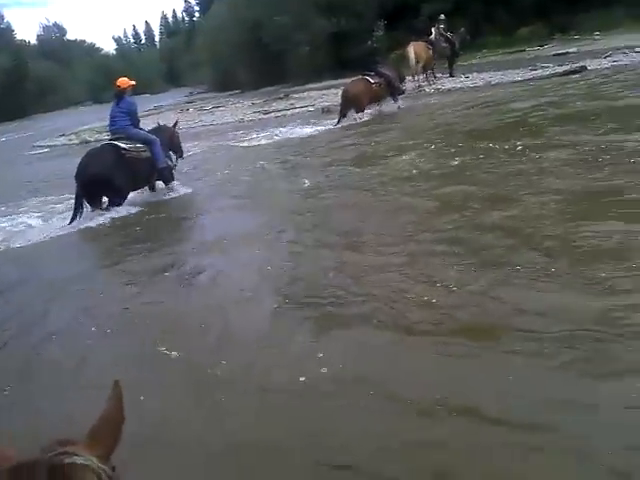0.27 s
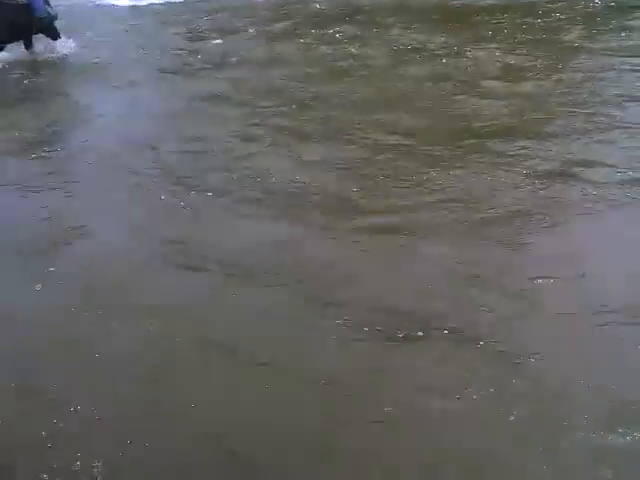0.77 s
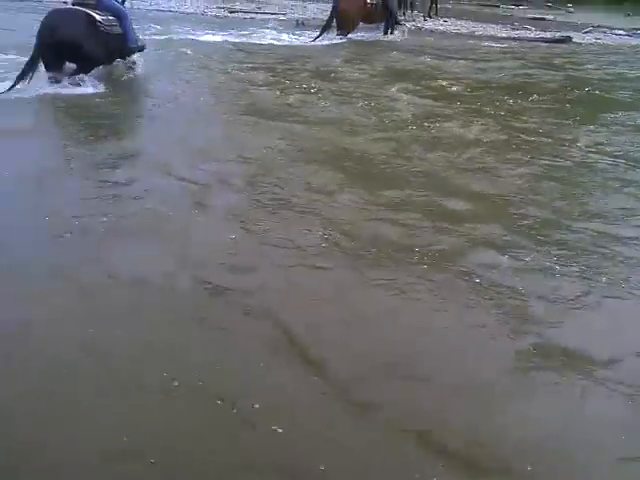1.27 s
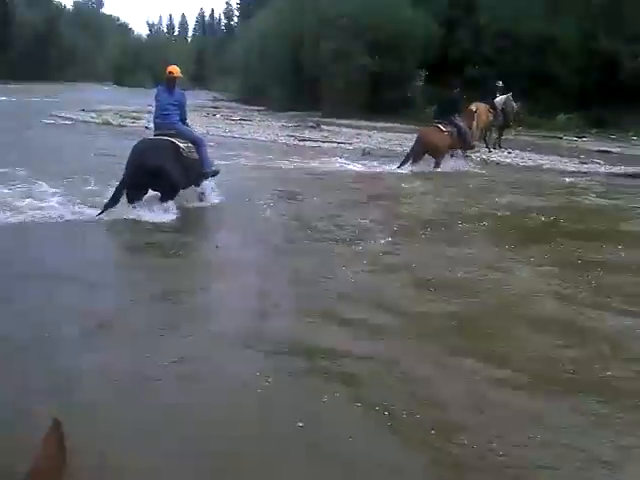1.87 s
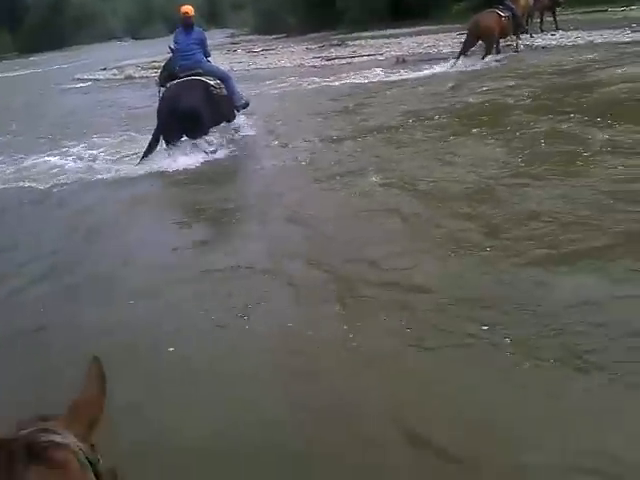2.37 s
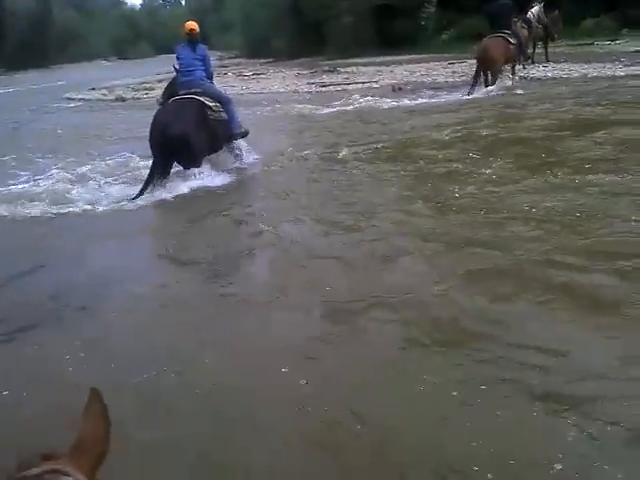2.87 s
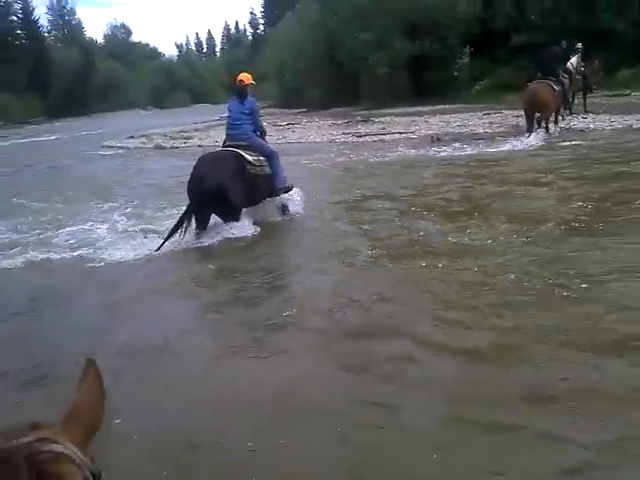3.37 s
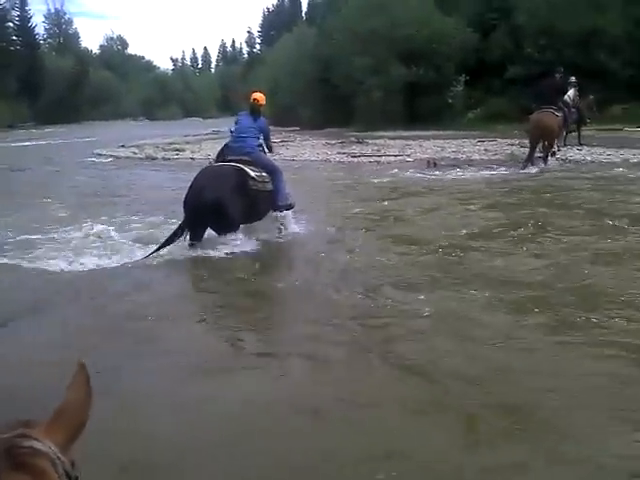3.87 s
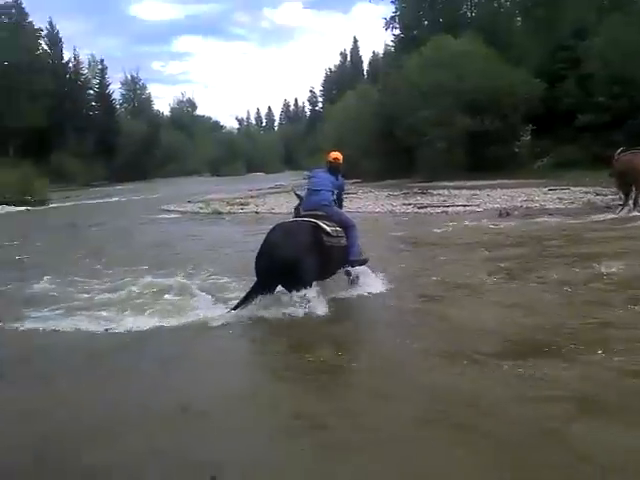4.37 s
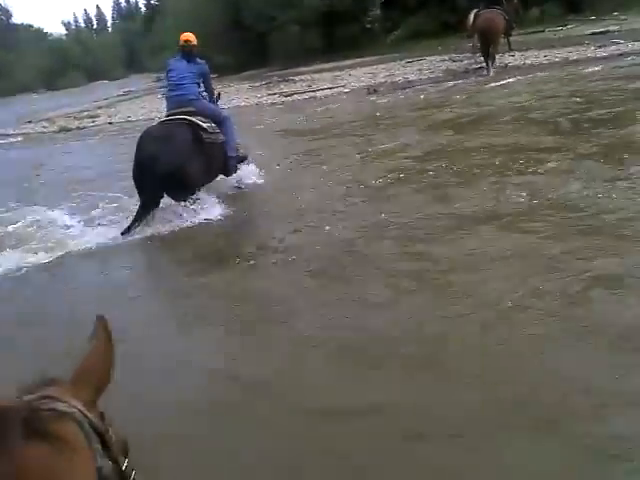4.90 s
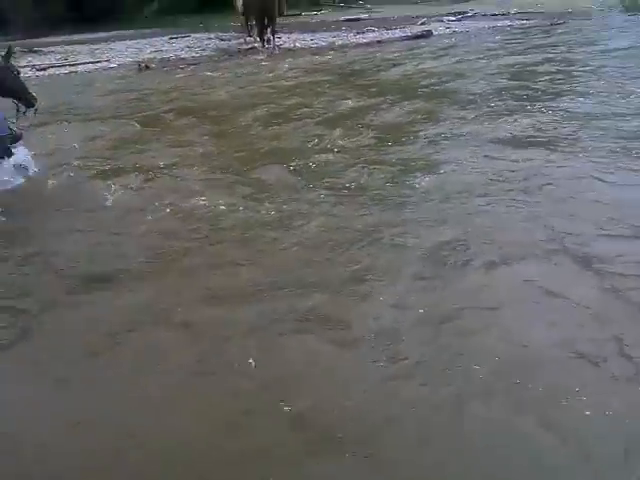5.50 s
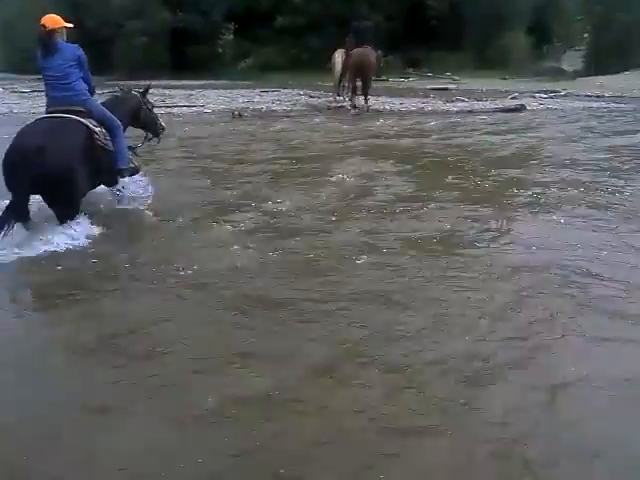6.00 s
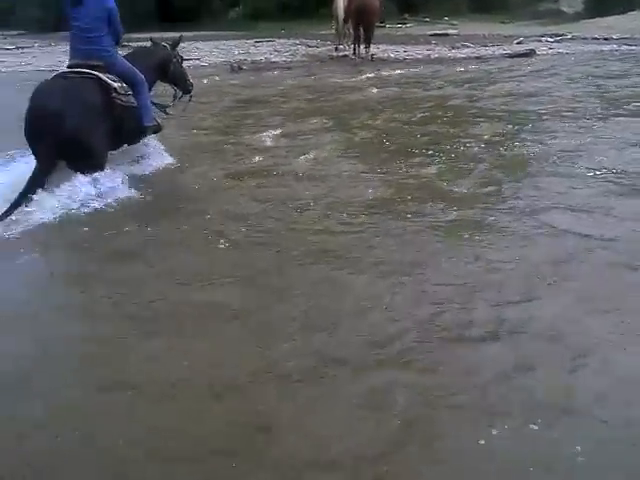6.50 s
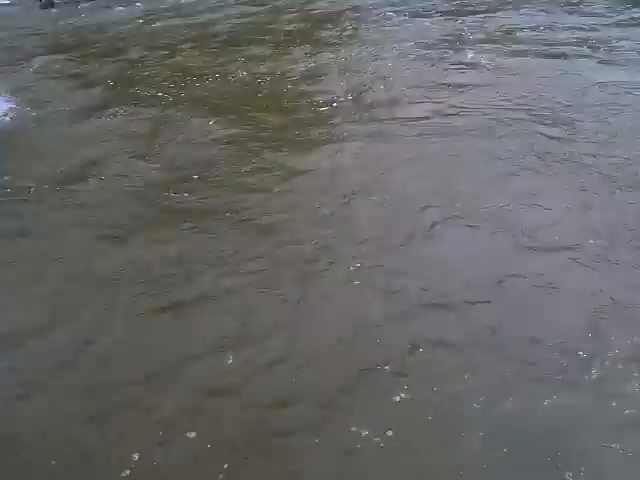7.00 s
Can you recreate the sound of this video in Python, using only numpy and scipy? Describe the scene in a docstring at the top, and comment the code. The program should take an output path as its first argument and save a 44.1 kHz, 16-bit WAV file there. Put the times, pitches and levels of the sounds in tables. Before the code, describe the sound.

Fast shallow creek water rushes steadily while horses wade through, their legs churning up gurgles, hollow gulps, sharp slaps and ragged splashes close by.

```python
"""Horses wading a shallow creek

Horses wade through a fast, shallow creek, heard in mono through a small microphone held by a rider.
Churned water sloshes, gurgles, rushes and sprays: four spectra of noise and clicks in flickering bands.
Droplets and gulps are rising sine pings; slaps, splashes and puffs of wind are shaped noise.
Six times the whole level drops at once and creeps back.
"""
import sys
import numpy as np
from scipy import signal
from scipy.io import wavfile

SR = 44100
rng = np.random.default_rng(int(sys.argv[2]) if len(sys.argv) > 2 else 0)


def log_audio(samples):
    """Write samples as a 16-bit WAV file to the path given in sys.argv[1]."""
    # one column per channel
    frames = np.atleast_2d(samples).T
    # limit to full scale, then quantise
    limited = np.clip(frames, -1, 1)
    pcm = np.round(limited * 32767).astype(np.int16)
    wavfile.write(sys.argv[1], SR, pcm)


N = 319725


def from_db(db):
    """Decibels to gain."""
    return 10 ** (np.asarray(db) / 20)


def rms_one(x):
    """Scale to rms 1."""
    return x / np.sqrt(np.mean(x ** 2) + 1e-20)


def at_hz(spectrum, hz):
    """Read a spectrum on a log-frequency axis."""
    f_hz, level_db = np.transpose(spectrum)
    return np.interp(np.log(hz), np.log(f_hz), level_db)


def bell(u_s, width_s):
    """Gaussian of peak 1 and full width width_s at half height."""
    return np.exp(-np.log(2) * (2 * u_s / width_s) ** 2)


def drift(corner_hz):
    """Slow chance of spread 1: noise at SR/40 through a double one-pole low-pass, run in."""
    step = 40
    pole = np.exp(-2 * np.pi * corner_hz * step / SR)
    white = rng.standard_normal(N // step + 2002)
    slow = signal.lfilter([1], [1, -2 * pole, pole * pole], white)[2000:]
    slow = rms_one(slow - slow.mean())
    return np.interp(np.arange(N) / step, np.arange(len(slow)), slow)


def bursts(per_s, spread_db):
    """Random clicks of very uneven size, as bubbles being born; rms 1."""
    sizes = from_db(spread_db * np.minimum(rng.exponential(1, N), 5))
    signs = rng.choice([-1, 1], N)
    born = rng.random(N) < per_s / SR
    return rms_one(sizes * signs * born)


def patchy(spectrum, swell, near_share, per_s, spread_db, patchy_db, flicker_hz):
    """Quarter-octave bands, each a size of bubble or eddy: far ones merge, near ones stand apart; rms 1."""
    low_hz, high_hz = spectrum[0][0], spectrum[-1][0]
    edges_hz = low_hz * 2 ** np.arange(0, np.log2(high_hz / low_hz) + 0.25, 0.25)
    drives = []   # three, so neighbouring sizes are born apart
    for _ in range(3):
        far = np.sqrt(1 - near_share) * rng.standard_normal(N)
        near = np.sqrt(near_share) * bursts(per_s, spread_db)
        drives.append(far + near)
    out = 0
    for k, (low, high) in enumerate(zip(edges_hz, edges_hz[1:])):
        bandpass = signal.butter(2, [low, high], "band", fs=SR, output="sos")
        band = signal.sosfilt(bandpass, drives[k % 3])
        level_db = at_hz(spectrum, np.sqrt(low * high)) + patchy_db * drift(flicker_hz)
        out = out + band * from_db(level_db)
    return rms_one(out * swell)


def swells(floor_db, rows):
    """A steady floor with bell-shaped swells added in power, as a gain."""
    t = np.arange(N) / SR
    power = from_db(2 * floor_db)
    for peak_s, peak_db, width_s in rows:
        power = power + from_db(2 * peak_db) * bell(t - peak_s, width_s)
    return np.sqrt(power)


def wading_levels():
    """Gains of gurgle, rush and spray as the legs churn the water, each wandering by chance."""
    # churned water before sway: t/s, gurgle/dB, rush/dB, spray/dB
    wading = [(0.0, -24.5, -22, -28.5), (0.52, -27.5, -24, -30), (0.7, -30, -21.5, -26.5),
              (0.83, -28, -24.5, -30.3), (1.02, -26.5, -22.5, -28.5), (1.17, -28.5, -24, -29.5),
              (1.45, -26, -22.5, -29.2), (1.6, -27.5, -21.5, -28.7), (2.3, -27, -22, -28.5),
              (2.46, -26, -20.5, -27.5), (2.65, -28, -22, -27.5), (3.05, -26, -23, -30.5),
              (3.46, -27, -22, -26), (3.6, -30, -22.5, -28.5), (3.78, -26, -21, -29),
              (4.1, -24.5, -21, -28.5), (4.62, -28.5, -19.3, -27.5), (4.7, -29, -22, -29.5),
              (4.97, -26, -21, -28.8), (5.45, -27.5, -22.5, -30.5), (5.67, -24, -21.5, -28),
              (5.8, -27.5, -21.5, -28), (6.03, -29, -23, -29), (6.17, -24.5, -21, -27),
              (6.35, -26.5, -21.5, -27.5), (7.25, -27, -22, -28.5)]
    sway_db, sway_hz = 0.74, 3.3
    t_s, *levels_db = np.transpose(wading)
    t = np.arange(N) / SR
    return [from_db(np.interp(t, t_s, level_db) + sway_db * drift(sway_hz)) for level_db in levels_db]


def slosh(heave):
    """Deep slosh, swelling as a leg pushes through."""
    # relative spectral density: f/Hz, level/dB
    slosh_spectrum = [(50, -36.5), (70, -17), (100, -0.5), (135, 3.5), (180, -14)]
    # pushes of a leg: t/s, peak level/dB, width at half power/s
    surges = [(0.3, -32, .09), (0.466, -32, 0.088), (0.753, -41, 0.11), (1.07, -39, 0.32),
              (2.107, -35, .12), (2.56, -44.5, 0.37), (3.244, -36.5, .15), (3.546, -25.5, 0.077),
              (4.276, -39, .05), (4.553, -31.5, .12), (4.93, -41, 0.036), (5.61, -30.5, 0.11),
              (5.736, -29.5, 0.079), (6.184, -42, 0.22), (6.5, -36, 0.1), (6.64, -34, .06),
              (6.83, -26.5, 0.062), (7.0, -36, .04)]
    water = patchy(slosh_spectrum, from_db(0.6 * heave), near_share=0.57, per_s=40,
                   spread_db=2.0, patchy_db=-1.0, flicker_hz=16)
    return swells(-47.5, surges) * water


def gurgle(level, heave):
    """Large bubbles in the churned water: low-mid noise with sparse clicks."""
    # relative spectral density: f/Hz, level/dB
    gurgle_spectrum = [(90, -26.5), (130, -8), (185, -1), (226, 1), (332, 2), (438, -1.5), (800, -5.5),
                       (1040, -27)]
    return level * patchy(gurgle_spectrum, from_db(0.36 * heave), near_share=0.23, per_s=150,
                          spread_db=2.0, patchy_db=1.5, flicker_hz=6.7)


def rush(level, heave):
    """Middling bubbles, mostly merged into noise."""
    # relative spectral density: f/Hz, level/dB
    rush_spectrum = [(350, -23.5), (600, -2), (955, -1), (1400, 0.5), (1900, 1.5), (2500, -3), (3100, -9.5),
                     (3800, -14), (4700, -47.5)]
    return level * patchy(rush_spectrum, from_db(1.35 * heave), near_share=0.15, per_s=1500,
                          spread_db=2.0, patchy_db=0.61, flicker_hz=6)


def spray(level, heave):
    """The smallest bubbles: treble noise with dense, very uneven clicks."""
    # relative spectral density: f/Hz, level/dB
    spray_spectrum = [(2000, -31), (3000, -8), (3800, -4), (4700, -4.5), (5600, -4), (6600, 0), (7400, 1.5),
                      (8600, -4)]
    return level * patchy(spray_spectrum, from_db(0.83 * heave), near_share=0.28, per_s=2800,
                          spread_db=4.5, patchy_db=0.96, flicker_hz=11)


def droplets(per_s, low_hz, high_hz, decay_cycles, spread_db):
    """Single near bubbles of chance size, each ringing a few cycles and rising in pitch; rms 1."""
    out = np.zeros(N + SR)
    for when, pitch, size in rng.random((round(per_s * N / SR), 3)):
        hz = low_hz * (high_hz / low_hz) ** pitch
        samples = np.arange(round(4 * decay_cycles * SR / hz))
        decays = samples * hz / SR / decay_cycles   # time in decay lengths
        cycles = decay_cycles * (decays + 0.041 * decays ** 2)
        ping = np.exp(-decays) * np.sin(2 * np.pi * cycles)
        gain = from_db(-spread_db * np.log(size + 1e-2))   # few large, many small
        start = int(when * N)
        out[start:start + len(ping)] += gain * ping
    return rms_one(out[:N])


def wind():
    """Puffs of wind on the microphone: patchy low rumble over a faint floor."""
    # relative spectral density: f/Hz, level/dB
    wind_spectrum = [(12, -4), (30, 5), (60, 1), (90, -14)]
    # puffs: t/s, peak level/dB, width at half power/s
    puffs = [(0.36, -41, .1), (0.64, -36, .04), (0.85, -42.5, .3), (2.56, -46, .2), (3.29, -40, .04),
             (3.88, -46, .15), (4.89, -47, .08), (5.47, -44.5, .1), (5.75, -45, .08), (6.7, -48.5, .1)]
    rumble = patchy(wind_spectrum, from_db(1.5 * drift(9.6)), near_share=0.4, per_s=24,
                    spread_db=2.0, patchy_db=-0.5, flicker_hz=5)
    return swells(-61, puffs) * rumble


def gulps():
    """Air closing behind the legs: each pocket swells, rings a few cycles and rises in pitch."""
    # larger pockets: t/s, peak level/dB, pitch f/Hz
    pockets = [(0.032, -25, 224), (0.082, -20, 433), (0.299, -17.5, 156), (0.393, -17, 433),
               (0.48, -24, 126), (0.91, -24.5, 164), (1.078, -17, 150), (1.14, -25, 95),
               (1.696, -11.5, 322), (1.738, -16, 272), (1.845, -16.5, 308), (1.961, -15.5, 358),
               (2.014, -17.5, 142), (2.126, -25.0, 128), (2.455, -17, 350), (2.906, -19, 288),
               (2.986, -15.5, 738), (3.311, -12.5, 408), (3.543, -23, 119), (3.959, -14, 361),
               (3.991, -21.5, 284), (4.197, -21, 496), (4.344, -23, 306), (4.444, -18, 272),
               (4.953, -18, 391), (5.19, -21, 308), (5.528, -20, 226), (5.594, -27, 101), (5.658, -17, 235),
               (5.705, -27, 150), (6.198, -25, 165), (6.419, -17.5, 363), (6.511, -11.5, 226),
               (7.0, -28, 110)]
    length_cycles = 4.3
    small_per_s, small_db, small_low_hz, small_high_hz = 3.3, -24.5, 236, 524
    rows = list(pockets)
    for when, size, pitch in rng.random((round(small_per_s * N / SR), 3)):   # small ones by chance
        hz = small_low_hz * (small_high_hz / small_low_hz) ** pitch
        rows.append((when * N / SR, small_db + 6 * (size - 0.5), hz))
    out = np.zeros(N + SR)
    for peak_s, level_db, hz in rows:
        phase, rise = rng.random(2)
        length_s = length_cycles / hz
        u = np.arange(-2 * length_s, 3 * length_s, 1 / SR)   # s from the loudest moment
        cycles = hz * (u + 0.097 * rise * u ** 2 / length_s) + phase
        piece = from_db(level_db) * bell(u, length_s) * np.sin(2 * np.pi * cycles)
        start = round((peak_s - 2 * length_s) * SR)
        out[max(start, 0):start + len(u)] += piece[max(-start, 0):]
    return out[:N]


def slaps():
    """Water slapping on water: wide noise bursts that start within a millisecond and die away."""
    # slaps: t/s, rms level before the envelope/dB, centre f/Hz
    slap_rows = [(0.289, -17, 2000), (.628, -25, 6000), (1.258, -23, 4500), (1.364, -18, 4500),
                 (2.431, -16, 1500), (2.449, -21, 2000), (2.505, -22, 1200), (2.556, -25, 1500),
                 (2.598, -24, 1800), (2.704, -21, 2000), (3.465, -17, 3500), (3.507, -22, 5000),
                 (5.384, -16.5, 3000), (6.690, -20, 3500), (6.702, -17, 4500), (6.735, -19, 3000)]
    attack_s, decay_s = 0.0004, 0.0045
    u = np.arange(SR // 5) / SR
    envelope = (1 - np.exp(-u / attack_s)) * np.exp(-u / decay_s)
    out = np.zeros(N + SR)
    for start_s, level_db, hz in slap_rows:
        bandpass = signal.butter(1, [hz / 1.2, hz * 1.6], "band", fs=SR, output="sos")
        band = signal.sosfilt(bandpass, rng.standard_normal(len(u)))
        start = round(start_s * SR)
        out[start:start + len(u)] += from_db(level_db) * rms_one(band) * envelope
    return out[:N]


def splashes():
    """Water thrown up by a leg and falling back: ragged swells of drops, about an octave wide."""
    # splashes: t/s, rms level before the envelope/dB, centre f/Hz
    splash_rows = [(0.336, -20, 741), (0.682, -25.5, 741), (1.066, -22, 741), (1.126, -24, 741),
                   (1.158, -28, 1691), (1.368, -30, 1691), (1.572, -23, 1691), (2.454, -19, 1691),
                   (2.551, -21, 741), (2.73, -19, 1691), (2.812, -21, 741), (2.894, -23.5, 1691),
                   (2.987, -26, 741), (3.339, -23.5, 741), (3.474, -26, 3605), (3.495, -25, 6123),
                   (3.722, -25.3, 741), (3.858, -30, 3605), (4.082, -23, 1691), (4.148, -31, 6123),
                   (4.452, -29, 3605), (4.627, -29, 741), (5.33, -29, 741), (5.381, -26, 1691),
                   (6.221, -26.5, 741), (6.706, -23.5, 1691), (6.712, -27, 4800), (7.157, -26, 741)]
    width_s = 0.034   # at half amplitude
    half = SR // 10
    u = np.arange(-half, half) / SR   # s from the loudest moment
    out = np.zeros(N + SR)
    for peak_s, level_db, hz in splash_rows:
        white, size = rng.standard_normal((2, len(u)))
        drops = white * from_db(3.2 * size)   # a few large drops among many small ones
        bandpass = signal.butter(2, [hz / 1.75, hz * 1.35], "band", fs=SR, output="sos")
        band = signal.sosfilt(bandpass, drops)
        start = round(peak_s * SR)
        out[start:start + len(u)] += from_db(level_db) * rms_one(band) * bell(u, width_s)
    return out[half:half + N]


def scene():
    """Four sizes of bubble share the fast heave of the water; the other sources lie on top."""
    gurgle_level, rush_level, spray_level = wading_levels()
    heave = 0.2 * drift(19) + 0.5 * drift(49)   # splashes come in clumps; each layer scales it to dB
    creek = (slosh(heave) + gurgle(gurgle_level, heave)
             + rush(rush_level, heave) + spray(spray_level, heave))
    pings = droplets(per_s=160, low_hz=353.7, high_hz=4480, decay_cycles=3.8, spread_db=3.0)
    near = rush_level * from_db(-11.5) * pings
    mono = creek + near + wind() + gulps() + slaps() + splashes()
    return np.array([mono, mono])


def record(dry):
    """The level drops and creeps back; two low-passes ease off, then cut, the highest treble."""
    # sudden drops of the whole sound: t/s, depth/dB, recovery time constant/s
    drops = [(.297, -3, 0.3), (1.081, -10, 0.13), (1.697, -3.5, 0.46), (3.312, -5.5, 0.15),
             (3.728, -6, 0.21), (6.297, -5, 0.16)]
    t = np.arange(N) / SR
    drop_db = np.zeros(N)
    for start_s, depth_db, recovery_s in drops:
        since_s = np.maximum(t - start_s, 0)
        drop_db += depth_db * (t > start_s) * np.exp(-since_s / recovery_s)
    ease = signal.cheby2(8, 30, 7900, fs=SR, output="sos")
    cut = signal.ellip(14, 0.5, 70, 7740, fs=SR, output="sos")
    eased = signal.sosfilt(ease, dry * from_db(drop_db))
    return signal.sosfilt(cut, eased)


dry = scene()
out = record(dry)
log_audio(out)
```